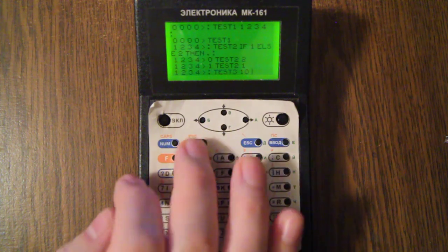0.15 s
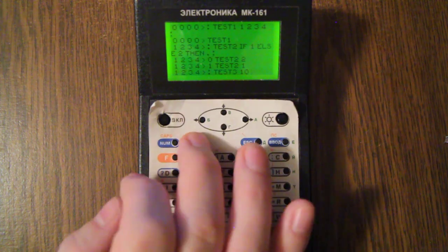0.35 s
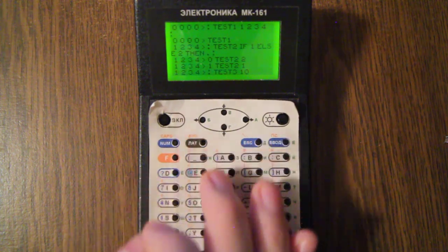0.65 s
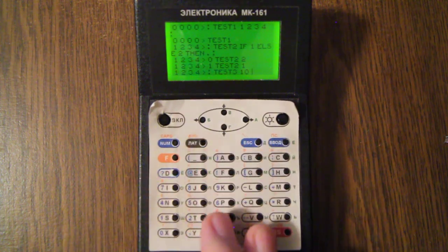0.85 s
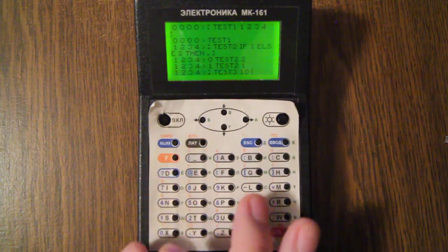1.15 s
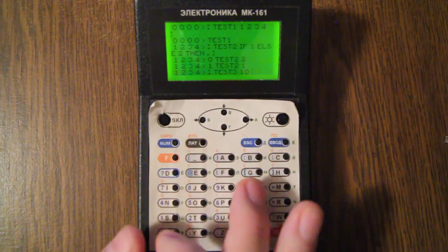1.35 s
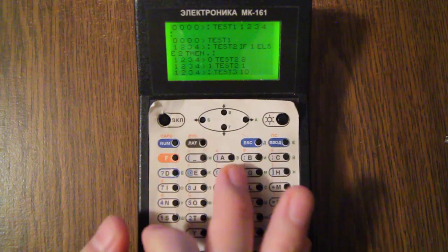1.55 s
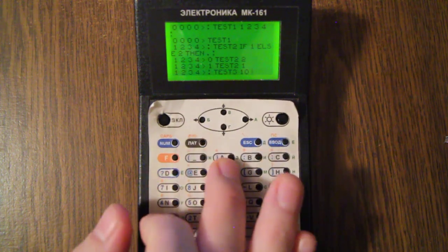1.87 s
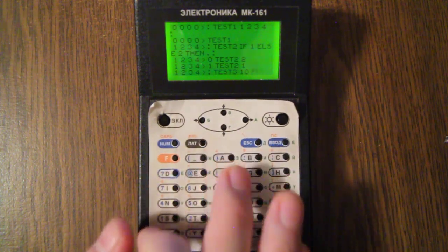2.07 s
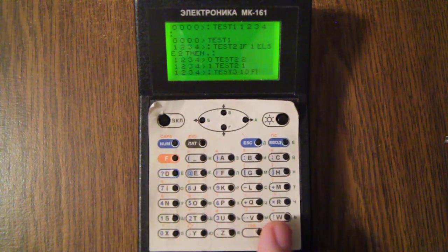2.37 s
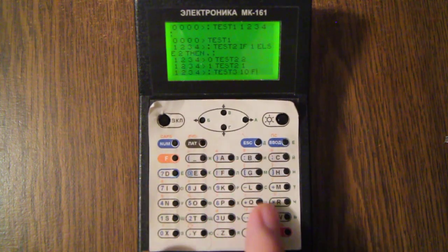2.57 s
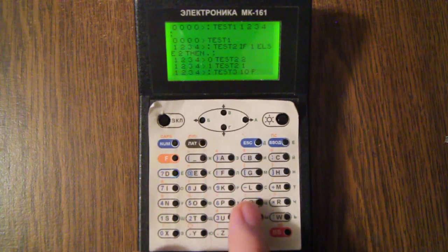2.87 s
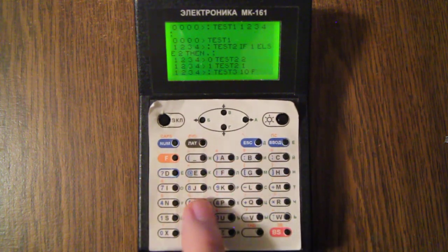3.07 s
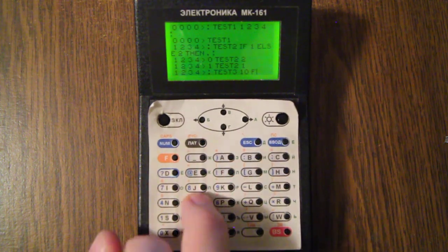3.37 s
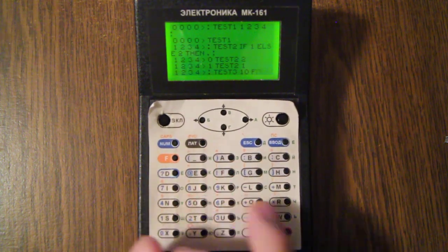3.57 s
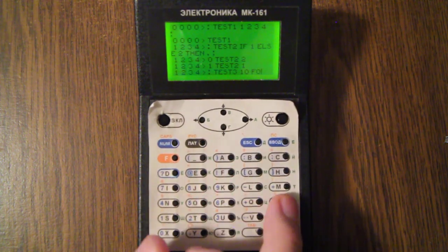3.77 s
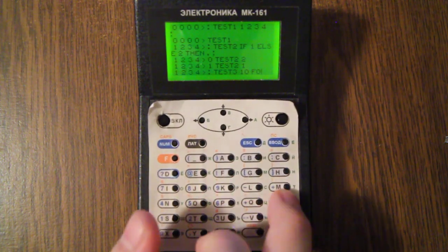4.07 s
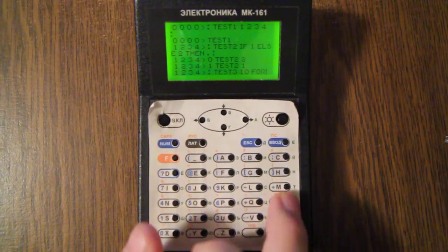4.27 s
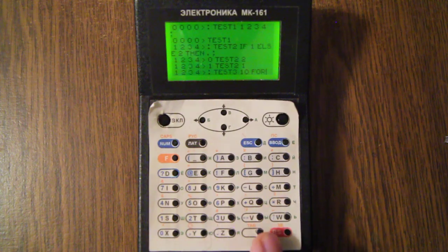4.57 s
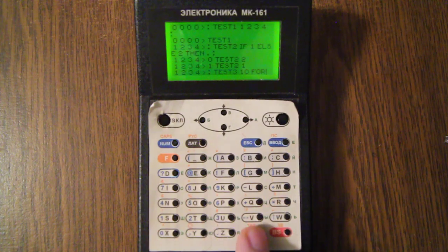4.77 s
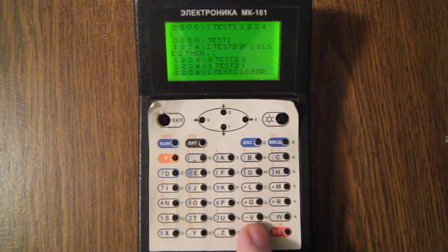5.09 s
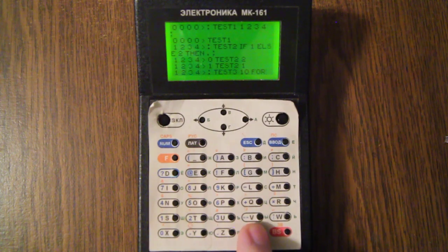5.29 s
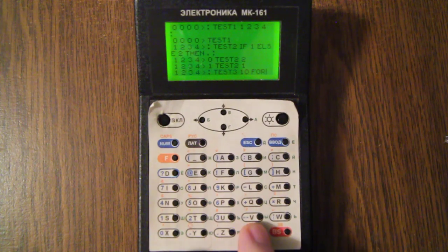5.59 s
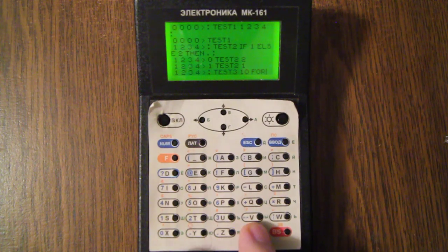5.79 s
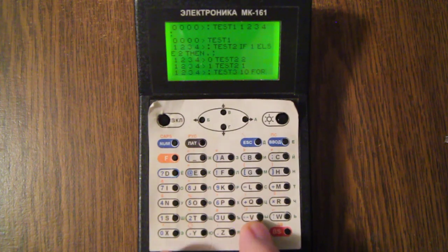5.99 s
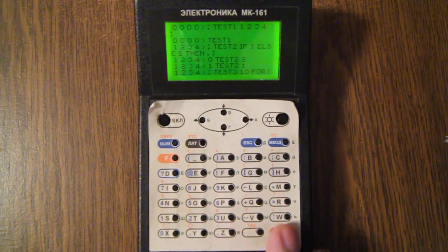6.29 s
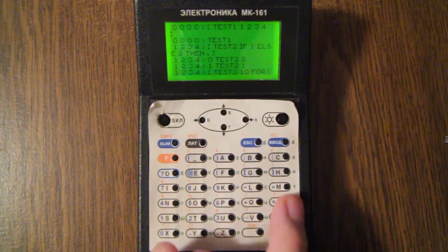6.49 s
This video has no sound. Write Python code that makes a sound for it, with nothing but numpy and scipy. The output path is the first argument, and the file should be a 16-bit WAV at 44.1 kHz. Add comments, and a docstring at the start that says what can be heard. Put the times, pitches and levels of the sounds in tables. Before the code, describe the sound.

Five slow, separate key presses on a small plastic keypad, each a sharp snap followed by a softer knock, above constant mid-high humming and hiss.

```python
"""A finger presses the stiff keys of a plastic calculator lying on a wooden desk in a small room. Each key
snaps through and later knocks back with a short rattle; the case and desk thud under it. Blows are decaying
modes and noise cracks with a room tail; skin brushing past, and one brief seat rattle, are banded noise. Behind
them a small fan whines steadily as resonant noise, over sine lines of hum and shaped hiss."""
import sys
import numpy as np
from scipy import signal
from scipy.fft import rfft, irfft
from scipy.io import wavfile
from scipy.ndimage import uniform_filter1d

SR = 44100
rng = np.random.default_rng(int(sys.argv[2]) if len(sys.argv) > 2 else 0)


def generate_wav(signal):
    """Clip the signal to [-1, 1] and save it as 16-bit WAV at the path in sys.argv[1]."""
    frames = np.transpose(np.atleast_2d(signal))
    scaled = np.clip(frames, -1, 1) * 32767
    pcm = np.round(scaled).astype(np.int16)
    wavfile.write(sys.argv[1], SR, pcm)


N = 292824
TIME = np.arange(N) / SR
RING = TIME[:SR // 4]  # time axis of one blow


def undb(db):
    """Decibels to gain."""
    return 10 ** (np.asarray(db) / 20)


def decay(t60):
    """Exponential fade of a blow, 60 dB down after t60 seconds."""
    return np.exp(-np.log(1000) * RING / t60)


def build_up(time_s):
    """Exponential rise of a blow from silence with the given time constant."""
    return 1 - np.exp(-RING / time_s)


def colour(x, points):
    """Shape x by a (Hz, dB) curve, without moving it in time."""
    hz, db = np.transpose(points)
    f = np.fft.rfftfreq(len(x), 1 / SR)
    gain = undb(np.interp(np.log(f + 1), np.log(hz), db))
    return irfft(rfft(x) * gain, len(x))


def band(x, edges, kind, order=2):
    """Causal low-, high- or band-pass."""
    edges = np.clip(edges, 20, .47 * SR)
    return signal.sosfilt(signal.butter(order, edges, kind, fs=SR, output="sos"), x)


def white():
    """Noise of 0 dB per Hz."""
    return rng.standard_normal(N) * np.sqrt(SR / 2)


def hump(hz, width):
    """Noise in one bell-shaped band, 0 dB per Hz at its centre."""
    f = np.fft.rfftfreq(N, 1 / SR)
    bell = .5 ** (2 * ((f - hz) / width) ** 2)
    return irfft(rfft(white()) * bell, N)


def walk(rate):
    """Smooth chance of unit spread, changing about rate times a second."""
    size = int(SR / rate)
    steps = np.repeat(rng.standard_normal(N // size + 1), size)
    w = uniform_filter1d(steps, size)[:N]
    return w / w.std()


def struck(x, db, size=353):
    """Set the rms level of the first 8 ms of a blow."""
    return x * undb(db) / np.sqrt(np.mean(x[:size] ** 2))


def air():
    """Room air and hiss: white noise shaped by a curve that falls towards the treble."""
    # hiss heard at the microphone: hz, level_db per Hz
    hiss = [(20, -102), (35, -89), (60, -85.5), (100, -83), (200, -86.5), (350, -90), (520, -92),
            (680, -87.5), (960, -92.5), (2000, -99), (3000, -101), (6000, -104.5), (10000, -109),
            (16000, -116)]
    return colour(white(), hiss)


def hum_lines(drift=0.00125, waver_db=3.5):
    """Mains and motor lines: sines whose pitch and level waver slightly."""
    # mains and motor lines: hz, level_db (rms, before the waver)
    hum = [(49.5, -70.5), (200, -75.5), (300, -75.5), (769.8, -66.5), (1201, -70), (1378, -64.5),
           (1436, -76), (1774, -78), (2439, -78.5), (2578, -83.5), (3245, -93.5), (3440, -79)]
    lines = 0
    for hz, db in hum:
        phase = np.cumsum(hz * (1 + drift * walk(6))) / SR
        level = undb(db + waver_db * walk(2.61))
        lines = lines + np.sqrt(2) * level * np.sin(2 * np.pi * phase)
    return lines


def fan_whine(flutter_db=1.96):
    """Air rushes through the fan's resonances, all fluttering together in level."""
    # fan resonances: hz, width_hz, level_db per Hz at the centre (before the flutter)
    fan = [(759, 73, -83), (1421, 251, -76.5), (1520, 245, -77), (2453, 350, -95.5), (3496, 540, -96.5)]
    rush = sum(undb(db) * hump(hz, width) for hz, width, db in fan)
    return rush * undb(flutter_db * walk(130))


def room(blow, t60=0.22, first_s=0.0039):
    """A small furnished room: reflections from all sides blur the blow's spectrum into a smooth tail."""
    # share of a blow that the walls send back: hz, level_db (relative to the blow)
    walls = [(50, -34), (120, -8), (600, -13.5), (1200, -6.5), (3000, -12.5), (4900, -11.5), (6300, -8.5),
             (8800, -9.5), (10500, -9), (15000, -16)]
    blurred = uniform_filter1d(np.abs(rfft(blow)) ** 2, size=130)
    noise = rfft(rng.standard_normal(len(RING)))
    diffuse = colour(irfft(noise * np.sqrt(np.abs(blurred)), len(RING)), walls)
    # the tail swells in over the first milliseconds, then dies away
    fade = decay(t60) * (1 - np.exp(-(RING / first_s) ** 2))
    return blow + diffuse * fade / np.sqrt(np.sum(fade ** 2))


def fingertip():
    """Skin brushes the key caps and the desk, and one key rattles briefly in its seat: banded noise with a
    rough level under a bell envelope."""
    # brushing hand, and at 4.32 s a brief rattle of the key settling in its seat: centre_s, half_length_s (to
    # 1/e), centre_hz, width_hz, level_db (rms at the middle)
    slides = [(0.863, 0.063, 5600, 2000, -67), (0.943, 0.076, 356, 90, -61.5),
              (3.468, 0.035, 642, 910, -56), (3.534, 0.017, 140, 90, -46), (3.946, 0.65, 226, 79, -58),
              (4.321, 0.0094, 2580, 750, -47), (6.21, 0.14, 205, 111, -54.5),
              (6.293, .04, 12300, 6000, -65)]
    out = 0
    for s, length, hz, width_hz, db in slides:
        rub = hump(hz, width_hz) * undb(3.5 * walk(80))
        swell = np.exp(-((TIME - s) / length) ** 2)
        out = out + rub / rub.std() * undb(db) * swell
    return out


def ring(modes, detune, scatter_db, turns):
    """Decaying modes; every contact shifts their pitch, weight and phase a little at random."""
    hz, db, t60 = np.transpose(modes)[:, :, None]
    pitch, weight, phase = rng.standard_normal((3, len(modes), 1))
    swing = np.sin(2 * np.pi * (hz * (1 + detune * pitch) * RING + turns * phase))
    return np.sum(undb(db + scatter_db * weight) * decay(t60) * swing, axis=0)


def case_thud(hard_hz, push_s=0.00078, buzz_db=-11, buzz_t60=0.039):
    """A push rocks the case on the desk, and its loose shell buzzes along."""
    # modes of the case on the desk: hz, level_db (relative), t60_s
    case_modes = [(103, -26, 0.17), (146, -10.5, 0.084), (224, -7, 0.062), (363, -14, 0.23),
                  (400.4, -11, 0.14), (458, -15, 0.059), (506, -23, 0.25), (550, -26, 0.037),
                  (602, -11, 0.087), (535, 10.5, 0.022), (670, -6, 0.065), (694, -1.5, 0.098),
                  (1100, -4.5, 0.065), (1175, 2.5, 0.045)]
    grit = rng.standard_normal(len(RING))
    case = ring(case_modes, detune=.005, scatter_db=1, turns=.07)
    # a soft push leaves out the case's upper modes
    rock = band(case * build_up(push_s), hard_hz, "low")
    buzz = band(grit, [1050, 1900], "band") * decay(buzz_t60)
    return band(struck(rock, 0) + struck(buzz, buzz_db), 107, "high", order=4)


def key_click(ring_hz, build_s, boost, sharpness, crack_t60=0.016, crack_db=6):
    """A noise crack joins the ringing key cap and switch, with one resonance favoured."""
    # modes of key cap and switch: hz, level_db (relative), t60_s
    switch_modes = [(1897, 9, 0.015), (2338, 0.5, 0.062), (2726, 0.5, 0.042), (3050, 13, 0.013),
                    (3430, -3, .03), (3900, -26, 0.019), (3930, -4, 0.024), (5300, 3, 0.028),
                    (5970, -2, .03), (6180, 8, 0.019), (6695, 10, 0.023), (7500, -23, .02),
                    (7550, -30, .02), (8400, -14, 0.018)]
    # crack of the contact: hz, level_db (relative)
    crack_curve = [(1300, -38), (2300, 1), (3600, -2), (4900, 1.5), (6300, -6.5), (8700, -9),
                   (10000, -10.5), (15000, -15)]
    switch = ring(switch_modes, detune=.008, scatter_db=2, turns=.3)
    grit = rng.standard_normal(len(RING))
    crack = colour(grit, crack_curve) * decay(crack_t60 + 4 * build_s)
    # a key that drags in its hole builds up gradually
    click = (struck(switch, 0) + struck(crack, crack_db)) * build_up(build_s)
    return click + boost * signal.lfilter(*signal.iirpeak(ring_hz, sharpness, SR), click)


def contact(thud_db, clack_db, snap_db, tick_db, hard_hz, ring_hz, build_s, boost=1.2, sharpness=4):
    """One contact: the case thud and three bands of the key's click, each at its own level."""
    thud = case_thud(hard_hz)
    click = key_click(ring_hz, build_s, boost, sharpness)
    clack = band(click, [1700, 4300], "band", order=4)
    snap = band(click, [5200, 9300], "band", order=4)
    tick = band(click, 8500, "high", order=4)
    low = struck(thud, thud_db) + struck(clack, clack_db)
    return low + struck(snap, snap_db) + struck(tick, tick_db)


def click_bands(clack_db, bright_db, tick_below_db=8):
    """Clack, snap and tick levels of a light contact: the duller it is, the weaker its treble."""
    return clack_db, clack_db + bright_db, clack_db + bright_db - tick_below_db


def touch(clack_db, bright_db, ring_hz, build_s):
    """A light tick of the key cap that hardly moves the case."""
    bands = click_bands(clack_db, bright_db)
    tick = contact(clack_db - 16, *bands, hard_hz=1400, ring_hz=ring_hz, build_s=build_s,
                   boost=2.6, sharpness=7.3)
    return [(0.00035, tick)]


def chatter(from_s, until_s, scrape_db, bright_db, weaker_db=9, scatter_db=2, count=3):
    """On its way up the loose key taps the sides of its hole at random moments."""
    taps = []
    for k, (late, strength) in enumerate(rng.uniform(0, 1, (count, 2))):
        db = scrape_db - weaker_db + scatter_db * (2 * strength - 1)
        bands = click_bands(db, bright_db + 1)
        tap = contact(db - 3, *bands, hard_hz=1400, ring_hz=2700, build_s=.0003)
        taps.append((from_s + (until_s - from_s) * (k + late) / count, tap))
    return taps


def release(thud_db, clack_db, hard_hz, build_s, scrape_s, scrape_db, seat_s, seat_db, bright_db):
    """The case rocks back softly, the key scrapes upwards and clicks into its seat."""
    knock_bands = click_bands(clack_db, bright_db - 4)
    scrape_bands = click_bands(scrape_db, bright_db)
    seat_bands = click_bands(seat_db, bright_db + 1.5)
    knock = contact(thud_db, *knock_bands, hard_hz, ring_hz=2380, build_s=build_s)
    scrape = contact(scrape_db + 2.5, *scrape_bands, hard_hz=1200, ring_hz=2980, build_s=0.0018)
    seat = contact(seat_db - 3, *seat_bands, hard_hz=1400, ring_hz=3850, build_s=0.00066)
    taps = chatter(scrape_s, seat_s, scrape_db, bright_db)
    return [(0, knock), (scrape_s, scrape), (seat_s, seat)] + taps


def press(thud_db, clack_db, snap_db, tick_db, hard_hz, ring_hz, bottom_hz, travel_s, build_s=.00007):
    """The switch snaps, bright and light; the key then hits bottom, duller, and rocks the case."""
    snap = contact(thud_db - 16, clack_db, snap_db, tick_db, hard_hz, ring_hz, build_s, boost=2.9)
    bottom = contact(thud_db, clack_db - 9, snap_db - 4.5, tick_db - 6, hard_hz, bottom_hz, build_s,
                     boost=3.8, sharpness=5)
    return [(0, snap), (travel_s, bottom)]


def keypad():
    """Every touch, press and release plays its contacts in turn, each with its reverberation."""
    # a fingertip lands on a key and nudges it in its hole:
    # start_s, clack_db, brightness_db (snap over clack), strongest_ring_hz, build_up_s
    touches = [(0.228, -43.5, -7, 3770, .0027), (0.2309, -41.5, -18, 2920, .0005),
               (2.6161, -48, -8, 4600, .0004), (3.761, -47.5, -13.5, 4150, 0.0018),
               (4.4474, -47.5, -6, 3280, .0001), (4.8625, -46.5, -22, 3080, .0011),
               (6.5566, -47.5, -8.5, 2630, .00015)]
    # a key snaps through and hits bottom: start_s, thud_db (at the bottom), clack_db, snap_db, tick_db
    # (these three at the snap), push_hardness_hz, snap_ring_hz, bottom_ring_hz, travel_s
    presses = [(0.3837, -31.5, -32.5, -42, -57, 880, 3050, 6740, 0.00092),
               (1.8023, -31.5, -29.5, -31.5, -49, 1800, 8360, 6000, 0.0016),
               (3.3112, -35, -30.5, -30.5, -46, 1390, 6900, 7000, .0008),
               (3.9902, -35.5, -29, -32, -41, 2200, 4120, 6000, .002),
               (5.8962, -41.5, -42, -50, -53, 900, 3700, 4500, .0008)]
    # the finger lets go, the key scrapes up its hole and seats: start_s, thud_db, clack_db, hardness_hz,
    # build_up_s, scrape_after_s, scrape_db, seat_after_s, seat_db, brightness_db (of the scrape)
    releases = [(0.5464, -29, -46, 585, 0.0047, 0.011, -48.5, .0252, -47.5, -11),
                (2.0449, -30, -44, 740, .0041, 0.012, -40.5, 0.029, -35.5, -8),
                (3.4978, -34, -48, 506, .0036, .0108, -44.5, .0234, -37.5, -12),
                (4.2778, -33.5, -40.5, 1260, 0.00077, .0028, -39.5, .0415, -54, -14),
                (6.139, -36.5, -50.5, 750, 0.00092, 0.0047, -47.5, .0461, -48.5, -9)]
    out = np.zeros(N + len(RING))
    for action, table in (touch, touches), (press, presses), (release, releases):
        for s, *stroke in table:
            for after_s, blow in action(*stroke):
                start = int((s + after_s) * SR)
                out[start:start + len(RING)] += room(blow)
    return out[:N]


def scene():
    """Keys and hand over the steady fan, hum and hiss, in mono."""
    background = air() + hum_lines() + fan_whine()
    return (background + fingertip() + keypad())[None]


def record(dry, top_hz=15900):
    """The recorder cuts the top with a steep low-pass."""
    low_pass = signal.ellip(10, .2, 70, top_hz, fs=SR, output="sos")  # ripple dB, stopband dB
    return signal.sosfilt(low_pass, dry)


dry = scene()
out = record(dry)
generate_wav(out)
```